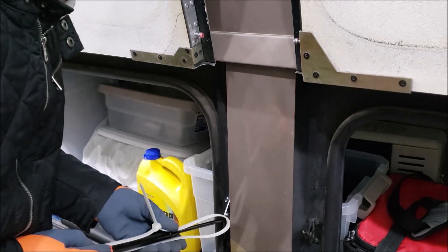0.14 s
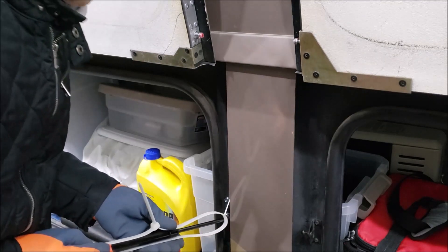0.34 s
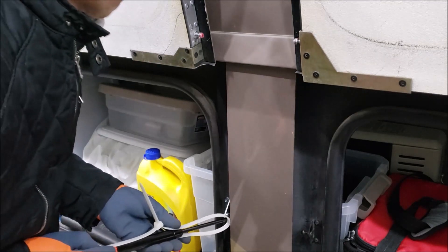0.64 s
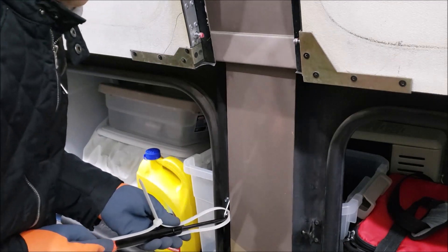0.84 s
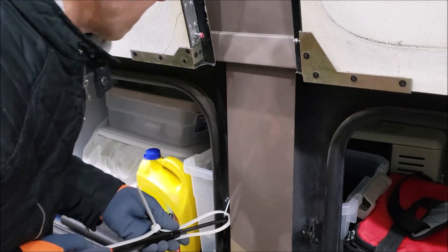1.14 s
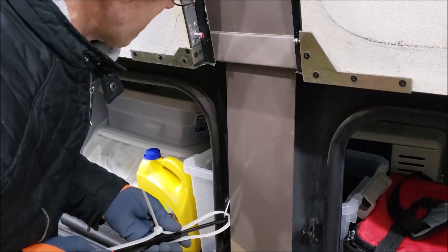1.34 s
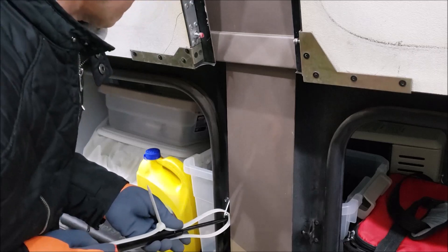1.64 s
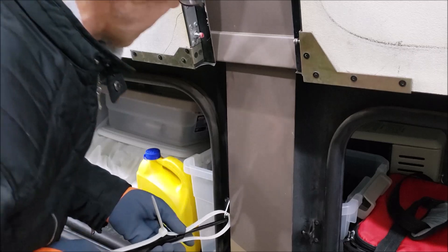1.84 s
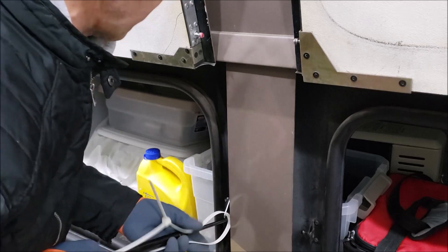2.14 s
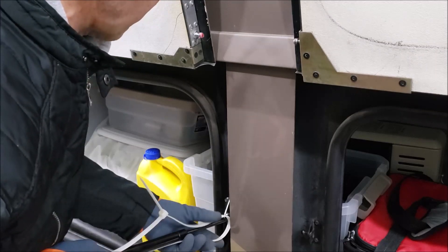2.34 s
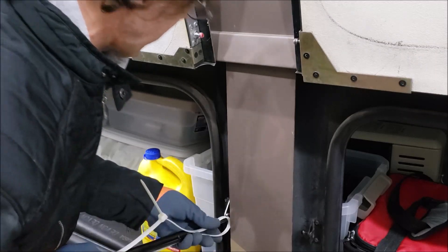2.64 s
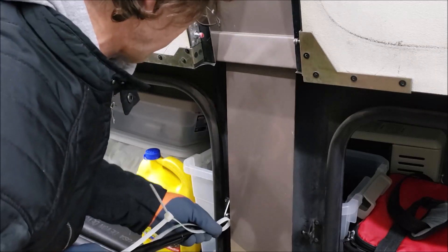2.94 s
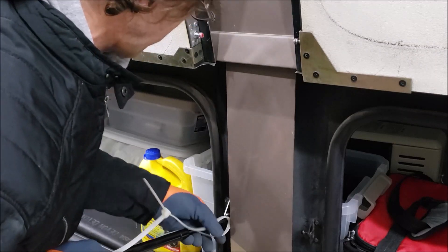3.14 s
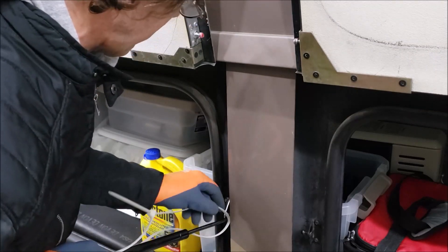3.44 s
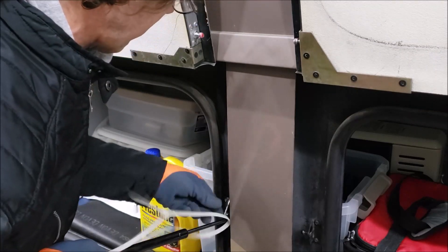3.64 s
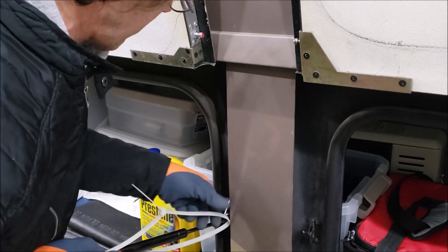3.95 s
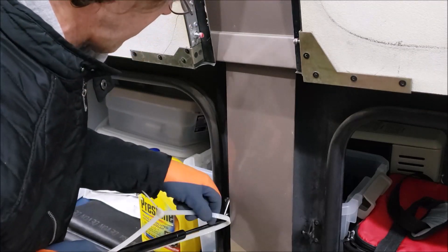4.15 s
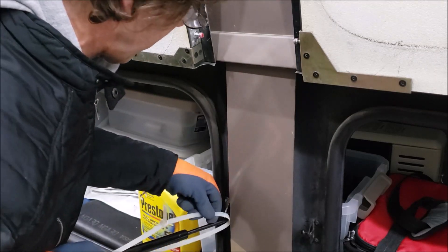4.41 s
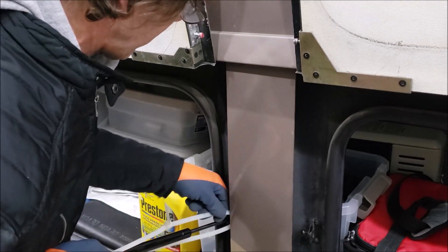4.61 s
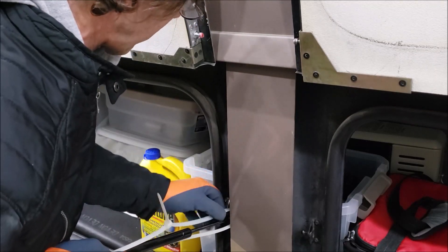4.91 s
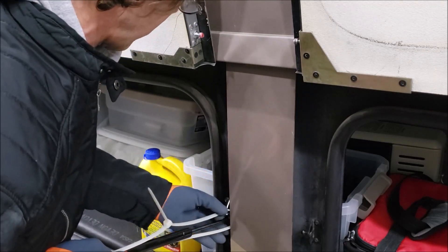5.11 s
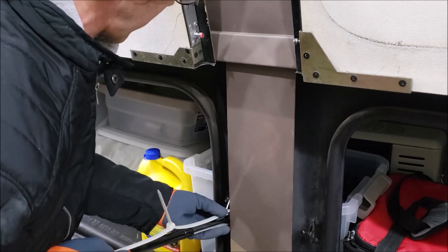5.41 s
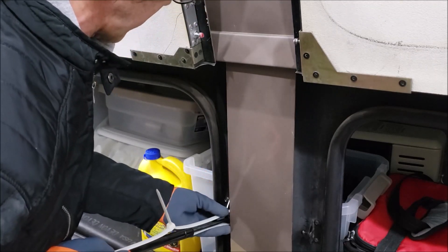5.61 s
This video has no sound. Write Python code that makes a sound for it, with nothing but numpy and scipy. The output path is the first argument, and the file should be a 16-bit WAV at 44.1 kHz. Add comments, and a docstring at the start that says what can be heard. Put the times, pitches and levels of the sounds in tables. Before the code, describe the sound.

Close up at a vehicle's open locker, gloves and a jacket rustle as a nylon zip tie is tightened around a hollow strut. About a second in, one longer pull rasps the strap through its head and thumps the strut. Scattered ticks, rubs and soft knocks follow, then two harder tugs crackle and shake the vehicle, the second loudest. A faint distant rumble and electrical hum lie underneath.

```python
"""Close up at a vehicle's open locker, gloved hands cinch a nylon zip tie round a hollow strut.
Over a distant rumble and mains hum, glove and jacket cloth rustle and the strap ticks. Near 1 s a long
pull rasps the strap through its head, thumps the strut and leaves a thin tone. Shorter tugs knock the
strut; two shake the vehicle, and between them the strap skitters over a metal edge. At the end the
background quietens. The left microphone port faces the work and hears more treble."""
import sys
import numpy as np
from scipy import signal
from scipy.fft import rfft, irfft, next_fast_len
from scipy.io import wavfile

SR = 44100
rng = np.random.default_rng(int(sys.argv[2]) if len(sys.argv) > 2 else 0)


def dump_mix(stems):
    """Bounce the given channels to the path in sys.argv[1] as a 16-bit WAV at rate SR."""
    frames = np.atleast_2d(stems).T  # one column per channel
    limited = np.clip(frames, -1, 1)  # hard clip at full scale
    pcm = np.round(limited * 32767).astype(np.int16)
    wavfile.write(sys.argv[1], SR, pcm)


N = 254516

# ticks, knocks and tooth slips, which each source offsets and stretches:
# t/s, strap level/dB, strut re strap/dB, crackle re strap/dB, rise/s, t60/s
TICKS = [(0.189, -50, -17, -8, 0.0011, 0.0085), (0.447, -59, -15, -16, 0.0028, 0.13),
         (0.839, -59, -24, -13, 0.0034, 0.091), (1.193, -42.5, -28.5, -12, 0.0093, 0.22),
         (1.361, -43, -8.5, -2.5, 0.0013, 0.083), (1.451, -45, -9, -22, 0.0039, 0.067),
         (1.466, -54, -4, -29, 0.0034, 0.31), (1.796, -57.5, -9.5, -38, 0.0033, 0.14),
         (1.919, -66, -0.5, -30, 0.0034, 0.59), (2.020, -33, -21, -35, 0.001, 0.025),
         (2.026, -36, -40.5, -41, 0.00059, 0.081), (2.225, -57.5, -14, -1, 0.0048, 0.22),
         (2.557, -53.5, -10.5, -14, 0.003, 0.1), (2.579, -43, -10.5, -12, 0.002, 0.036),
         (2.732, -38, -3.5, -20, 0.00031, 0.1), (2.874, -61, 3, -35, 0.0049, 0.1),
         (2.94, -54, -12, -1.5, 0.0011, 0.066), (3.127, -46.5, -19.5, -16, 0.0025, 0.066),
         (3.325, -54, -15.5, 0, 0.00076, 0.33), (3.656, -56, -6.5, -29, 0.0051, 0.24),
         (3.698, -45, -17, 7, 0.0019, 0.028), (3.712, -37, -16.5, 21.5, 0.0024, 0.038),
         (3.728, -32, -9.5, -1, 0.0028, 0.037), (4.028, -57.5, -3, -36, 0.0046, 0.2),
         (4.076, -54, -0.5, -5.5, 0.0019, 0.19), (4.153, -38.5, -7.5, -13.5, 0.012, 0.07),
         (4.507, -44.5, -4.5, -13.5, 0.00041, 0.19), (4.566, -50, -1.5, 7.5, 0.0011, 0.091),
         (4.615, -21.5, -14.5, -3.5, 0.0074, 0.05), (4.625, -22.5, -20, -0.5, 0.0038, 0.037),
         (4.7106, -24, -17.5, -3.5, 0.00011, 0.085), (4.7743, -39.5, -7.5, -11, 0.00071, 0.013),
         (4.8131, -45.5, -3.5, 28, 0.00056, 0.017), (5.028, -49, -55, 3, 0.0015, 0.016),
         (5.061, -37.5, -22.5, -8, 0.00042, 0.17), (5.154, -45, -34, -20.5, 0.00044, 0.063),
         (5.185, -40, -25, -22, 0.0008, 0.98), (5.343, -43, -21.5, 8, 0.0002, 0.099)]
# hand movements, one rub each; swell and fade span 20 dB at pace 1:
# peak t/s, cloth level/dB, strap level/dB, strut level/dB, swell/s, fade/s
MOVES = [(0.098, -57.5, -87, -78, 0.17, 0.12), (0.592, -58.5, -79, -74, 0.22, 0.31),
         (0.869, -65, -83, -87, 0.049, 0.12), (1.139, -55, -56, -58, 0.11, 0.15),
         (1.388, -56.5, -56.5, -59, 0.092, 0.19), (1.521, -93, -63, -54.5, 0.24, 0.067),
         (1.81, -142, -75, -63, 0.04, 0.42), (2.028, -51, -47, -64.5, 0.088, 0.068),
         (2.351, -60, -74.5, -70.5, 0.56, 0.21), (2.589, -76, -66, -50.5, 0.036, 0.067),
         (2.749, -66.5, -65, -42, 0.039, 0.099), (2.85, -68, -77, -69.5, 0.35, 0.33),
         (3.14, -63.5, -74.5, -68, 0.22, 0.12), (3.321, -62.5, -90, -72.5, 0.14, 0.29),
         (3.74, -52.5, -57, -52.5, 0.11, 0.081), (3.918, -64, -70.5, -75, 0.25, 0.057),
         (4.179, -60.5, -64, -45.5, 0.17, 0.16), (4.348, -69, -76.5, -51.5, 0.11, 0.16),
         (4.53, -66, -56.5, -46, 0.036, 0.43), (4.67, -47, -52, -59, 0.065, 0.16),
         (4.76, -52.5, -44, -49, 0.19, 0.17), (4.991, -54.5, -65.5, -93, 0.026, 0.11),
         (5.1, -67, -58, -56, 0.12, 0.26), (5.328, -51.5, -51, -58, 0.25, 0.055)]


def from_db(db):
    """dB to gain."""
    return 10 ** (np.asarray(db) / 20)


def rms_one(x):
    """Scales to rms 1."""
    return x / np.sqrt(np.mean(x ** 2) + 1e-20)


def at_hz(points, hz):
    """Reads a spectrum on a log-frequency axis."""
    point_hz, values = np.transpose(points)
    return np.interp(np.log(np.maximum(hz, 1)), np.log(point_hz), values)


def drift(rate_hz):
    """Slow random wander of rms 1."""
    r = np.exp(-80 * np.pi * rate_hz / SR)
    slow = signal.lfilter([1], [1, -2 * r, r * r], rng.standard_normal(N // 40 + 2002))[2000:]
    return np.interp(np.arange(N) / 40, np.arange(len(slow)), rms_one(slow))


def passed(x, hz, kind):
    """Low- or high-pass of order 2."""
    return signal.sosfilt(signal.butter(2, hz, kind, fs=SR, output="sos"), x)


def coloured(x, gain):
    """Weights the spectrum by gain(hz)."""
    size = next_fast_len(N + 4096)
    return irfft(rfft(x, size) * gain(np.arange(size // 2 + 1) * SR / size), size)[..., :N]


def shaped(force, spectrum):
    """Colours a force; white force of rms 1 gives rms 1."""
    mean_power = np.mean(from_db(2 * at_hz(spectrum, np.linspace(1, SR / 2, 4000))))
    return coloured(force, lambda hz: from_db(at_hz(spectrum, hz))) / np.sqrt(mean_power)


def body(force, modes):
    """Parallel resonances with alternating signs, scaled by their summed power."""
    out, power = 0, 0
    for k, (hz, width_hz, level_db) in enumerate(modes):
        r = np.exp(-np.pi * width_hz / SR)
        b = (1 - r * r) / 2 * np.array([1, 0, -1])
        a = [1, -2 * r * np.cos(2 * np.pi * hz / SR), r * r]
        out = out + (-1) ** k * from_db(level_db) * signal.lfilter(b, a, force + 1e-18)
        power += from_db(2 * level_db) * np.pi * width_hz / SR
    return out / np.sqrt(power)


def stereo(mid, side, alike):
    """Two channels with the given likeness."""
    return (np.sqrt(1 + alike) * mid + np.sqrt(1 - alike) * side * [[1], [-1]]) / np.sqrt(2)


def grains(per_s, spread_db, alike):
    """Stick-slip friction: random tiny slips of uneven size over a smooth hiss; rms 1."""
    sizes = from_db(spread_db * np.minimum(rng.exponential(1, N), 4))
    slips = sizes * (rng.random(N) < per_s / SR)
    force = 1.23 + rms_one(signal.lfilter([1], [1, -.9], slips))
    return rms_one(stereo(*(force * rng.uniform(-1.227, 1, (2, N))), alike))


def rubbing(peak_db, rest_db, pace):
    """Envelope of all hand movements over a resting level; a higher pace makes each rub shorter."""
    t, out = np.arange(N) / SR, np.full(N, from_db(rest_db))
    for (s, *_, swell, fade), level_db in zip(MOVES, peak_db):
        away = np.maximum((s - t) / swell, (t - s) / fade)
        out += from_db(level_db - 20 * pace * away ** 1.076)   # a nearly pointed peak
    return out


def blows(offset_db, stretch, snap_db, lag_s=.0001):
    """Envelope of all ticks: a rise, a brief snap if the contact is abrupt, an exponential fall."""
    out = np.zeros(N)
    for (s, level_db, _, _, rise, t60), off_db in zip(TICKS, offset_db):
        at = round(s * SR)
        t = np.arange(min(SR // 2, N - at)) / SR
        rise += lag_s
        since_peak = np.maximum(t - rise, 0)
        fall = from_db(-60 * since_peak / (t60 * stretch))
        snap = from_db(snap_db) * np.exp(-since_peak / 0.00014 - rise / 0.0045)
        out[at:at + len(t)] += from_db(level_db + off_db) * np.minimum(t / rise, 1) ** 2 * (fall + snap)
    return out


def clicks(offset_db, right_lag_s=.00025):
    """One sharp push at full contact of each tick, late at the right port; slow contacts hardly click."""
    s, level_db, _, _, rise, _ = np.transpose(TICKS)
    out = np.zeros(N)
    out[np.round((s + rise) * SR).astype(int)] = from_db(level_db + offset_db) * np.exp(-rise / 0.0014)
    return np.array([out, np.roll(out, round(right_lag_s * SR))])


def rumble_and_air():
    """Air hiss and a distant rumble that recedes, swelling when hard tugs shake the vehicle."""
    # background spectrum: f/Hz, relative density/dB
    spectrum = [(18, -51), (30, -3.5), (58, -0.5), (86, -11), (184, -22.5), (329, -31), (464, -28.5),
                (619, -36.5), (3090, -56.5), (7160, -42.5), (8840, -63), (12000, -36.5), (15900, -41.5)]
    # how alike the two ports hear it: f/Hz, likeness/0..1
    likeness = [(60, 0.96), (200, 0.58), (550, 0.14), (1650, 0.046)]
    # tugs that shake the vehicle: t/s, rumble gain/dB
    shakes = [(3.78, 12.5), (4.701, 16)]
    t = np.arange(N) / SR
    mid, side = rng.standard_normal((2, N))
    mid = coloured(mid, lambda hz: from_db(at_hz(spectrum, hz)) * np.sqrt(1 + at_hz(likeness, hz)))
    side = coloured(side, lambda hz: from_db(at_hz(spectrum, hz)) * np.sqrt(1 - at_hz(likeness, hz)))
    air = from_db(-59) * rms_one(mid + side * [[1], [-1]])
    rumble = passed(passed(air, 190, "low"), 45, "high")
    recede_db = 3.5 - t   # 1 dB a second
    shake_db = sum(db * np.exp(-((t - s) / 0.11) ** 2) for s, db in shakes)
    air += (from_db(recede_db + shake_db) - 1) * rumble
    air *= from_db(-5 * np.clip((t - 5.45) * 10, 0, 1))   # quieter at the end
    return air + (from_db(3.8 * drift(3.7)) - 1) * passed(air, 5000, "high")   # the treble flutters


def mains_hum():
    """Two low partials that waver in level and phase."""
    # hum partials: f/Hz, relative level/dB
    partials = [(59, -70), (119, -71.5)]
    t = np.arange(N) / SR
    return sum(from_db(db + 5 + 3.2 * drift(17)) * np.sin(2 * np.pi * hz * t + 0.67 * drift(9.7))
               for hz, db in partials)


def cloth_rustle():
    """Glove and jacket cloth rub with each movement and crackle at each tick."""
    # cloth friction spectrum: f/Hz, relative density/dB
    spectrum = [(1120, -22.5), (1900, -9), (2350, -8), (3330, -3), (5420, -7.5), (6030, -3), (8380, -8),
                (12800, -1.5), (15900, -0.5)]
    crackle_db = np.array(TICKS)[:, 3]
    rub = rubbing(np.array(MOVES)[:, 1], rest_db=-95, pace=1) * from_db(0.405 * drift(30.7))
    crackle = blows(np.minimum(crackle_db, 6) - 5, stretch=1, snap_db=1.5)
    sharp = blows(crackle_db - 11, stretch=0.36, snap_db=1.5)
    friction = grains(per_s=900, spread_db=1.8, alike=0.05)
    top = passed(passed(sharp * friction, 9100, "high"), 9100, "high")   # the hardest crackles are all top
    return shaped((rub + crackle) * friction + top, spectrum)


def taut_strap():
    """Rubs and ticks ring the taut nylon strap."""
    # strap resonances: f/Hz, width/Hz, relative level/dB
    modes = [(787, 220, 3), (1129, 103, 3), (1241, 184, 0.5), (1788, 166, -0.5), (1920, 200, -1.5),
             (2690, 440, -3.5)]
    rub = rubbing(np.array(MOVES)[:, 2], rest_db=-87, pace=1.65) * from_db(3.1 * drift(40))
    ticks = blows(np.full(len(TICKS), -8), stretch=0.55, snap_db=12)
    force = (rub + ticks) * grains(per_s=900, spread_db=0.83, alike=0.43) + clicks(12.7)
    return passed(body(force, modes), 2290, "low")


def strap_teeth():
    """The stiff teeth ring at each tick; blows that miss the strut are brighter."""
    # tooth resonances: f/Hz, width/Hz, relative level/dB
    modes = [(2820, 580, -2), (3660, 410, 2), (4540, 1450, -4.5)]
    ticks = blows(-.4 * np.array(TICKS)[:, 2] - 22, stretch=0.9, snap_db=4.5)
    return body(ticks * grains(per_s=1700, spread_db=1.7, alike=0.13), modes)


def hollow_strut():
    """The heavy tube answers late: it knocks at each tick and groans under the gloves."""
    # tube resonances: f/Hz, width/Hz, relative level/dB
    modes = [(155, 26.4, -10.5), (249, 14.8, -1), (317.2, 16.5, -12.5), (404, 93, -5), (462.3, 26.7, 2.5),
             (512, 127, -7.5)]
    knock_db = np.array(TICKS)[:, 2]
    jolts = blows(knock_db + 5, stretch=0.99, snap_db=-2, lag_s=0.0038)
    force = jolts * grains(per_s=400, spread_db=2.6, alike=0.89) + clicks(knock_db + 26)
    knocks = passed(body(force, modes), 1600, "low")
    rub = rubbing(np.array(MOVES)[:, 3], rest_db=-89.5, pace=1.52)
    rub = np.roll(rub, round(0.011 * SR)) * from_db(1.1 * drift(29))
    drag = rub * grains(per_s=200, spread_db=1, alike=0.87)
    groan = passed(body(drag, modes[:3]), 430, "low")   # soft gloves stir the low modes only
    return passed(knocks + groan, 190, "high")


def long_pull(teeth_per_s=240):
    """The pawl skips unevenly over the teeth; each skip jolts the strut and pulses the rasp."""
    # course of the pull through the head: t/s, shudder level/dB, rasp level/dB
    course = [(.9, -90, -73), (.93, -84, -46), (.953, -43.5, -41.5), (.98, -42, -38.5), (1.02, -48, -36),
              (1.05, -35.5, -33), (1.075, -33.5, -35), (1.11, -48, -50), (1.17, -62, -62)]
    # the shuddering strut: f/Hz, relative density/dB
    shudder_spectrum = [(80, -38.5), (150, -9), (330, 0.5), (655, -12), (1460, -15), (2500, -17),
                        (4200, -37)]
    # the rasping pawl: f/Hz, relative density/dB
    rasp_spectrum = [(1200, -11.5), (2300, -10.5), (2800, 1.5), (3300, -3), (3750, 3.5), (5200, -5.5),
                     (7300, -3), (9100, -14), (13000, -4.5), (15900, -13)]
    t = np.arange(N) / SR
    times, shudder_db, rasp_db = np.transpose(course)
    moving = (t > times[0]) & (t < times[-1])
    tooth_phase = np.cumsum(teeth_per_s * from_db(2.5 * drift(60))) / SR % 1
    pulse = np.exp(-tooth_phase / 0.47)
    noise = rng.standard_normal((4, N))
    shudder = moving * from_db(np.interp(t, times, shudder_db)) * rms_one(0.37 + pulse)
    rasp = moving * from_db(np.interp(t, times, rasp_db)) * rms_one(3.6 + pulse)
    return (shaped(shudder * stereo(*noise[:2], alike=0.69), shudder_spectrum)
            + shaped(rasp * stereo(*noise[2:], alike=0.064), rasp_spectrum))


def strut_thumps():
    """Hard jerks land on the strut as dull thumps."""
    # jerks on the strap: t/s, relative level/dB
    jerks = [(.952, -26), (.964, -28), (.976, -24), (1.054, -21.5), (1.072, -20), (1.087, -22.5),
             (1.363, -30), (4.775, -24)]
    force = np.zeros(N)
    for s, db in jerks:
        force[round(s * SR)] = from_db(db)
    return 20 * passed(passed(force, 530, "low"), 170, "high")


def squeak(start_s=1.17, lasts_s=.19, top_hz=4800, fall_hz_per_s=320):
    """A thin, faint tone hangs on after the pull, sinking slightly."""
    since = np.clip(np.arange(N) / SR - start_s, 0, lasts_s)
    turns = np.cumsum(top_hz - fall_hz_per_s * since) / SR
    envelope = from_db(-77 + 3.7 * drift(40)) * np.sin(np.pi * since / lasts_s)
    return envelope * np.sin(2 * np.pi * turns)


def edge_skitter(skip_s=0.018):
    """The strap skitters over a metal edge and rings it."""
    # skips over the edge: t/s, level/dB
    skips = [(4.035, -69.5), (4.085, -70), (4.166, -55.5), (4.32, -68)]
    # edge resonance: f/Hz, width/Hz, relative level/dB
    modes = [(1950, 220, 0)]
    t = np.arange(N) / SR
    envelope = sum(from_db(db) * np.exp(-((t - s) / skip_s) ** 2) for s, db in skips)
    return body(envelope * grains(per_s=600, spread_db=1.6, alike=0.61), modes)


def locker_echo(x, bass_t60_s=0.29, wall_cut_hz=6900):
    """Eight feedback delays a side, duller on every round; both ports hear the same bass."""
    size = next_fast_len(N + SR // 2)
    w = 2 * np.pi * np.arange(size // 2 + 1) / size
    dull = np.exp(-2 * np.pi * wall_cut_hz / SR)
    wall = (1 - dull) / (1 - dull * np.exp(-1j * w))
    response = np.zeros((2, len(w)), complex)
    for k, lag in enumerate((rng.uniform(.006, 0.025, 16) * SR).astype(int)):
        loop = from_db(-60 * lag / SR / bass_t60_s) * wall * np.exp(-1j * w * lag)
        response[k % 2] += (-1) ** (k // 2) * loop / (1 - loop)
    left, right = irfft(rfft(x, size) * response, size)[:, :N]
    side = passed((left - right) / 2, 640, "high")
    return (left + right) / 2 + side * [[1], [-1]]


def scene():
    """Hands at work near the microphone, the locker's echo and the distant background."""
    far = passed(passed(rumble_and_air() + mains_hum(), 35, "high"), 35, "high")
    near = cloth_rustle() + taut_strap() + strap_teeth() + hollow_strut()
    near += long_pull() + strut_thumps() + squeak() + edge_skitter()
    return far + near + from_db(-13.5) * locker_echo(near.mean(axis=0))


def record(dry):
    """A two-port microphone, its left port facing the work; nothing passes above 16.5 kHz."""
    # balance of the ports: f/Hz, left minus right/dB
    balance = [(60, 2.5), (150, 2), (380, 0.5), (2380, -2), (5980, 4), (15000, 15)]
    ports = coloured(dry, lambda hz: from_db(np.array([[.5], [-.5]]) * at_hz(balance, hz)))
    return signal.sosfilt(signal.cheby2(18, 70, 16500, fs=SR, output="sos"), ports)


dry = scene()
out = record(dry)
dump_mix(out)
```